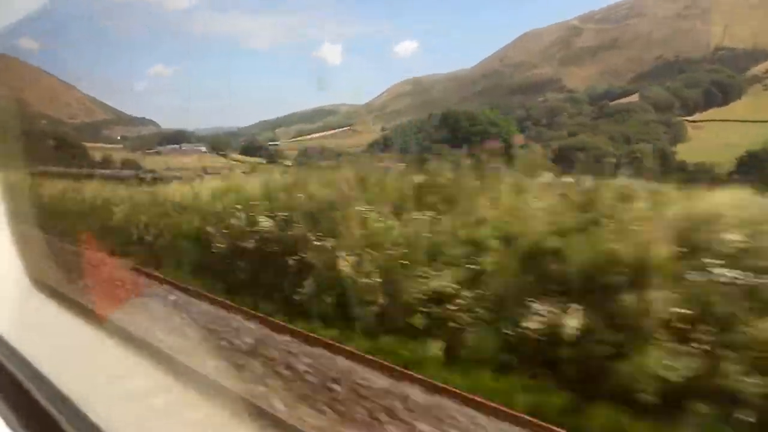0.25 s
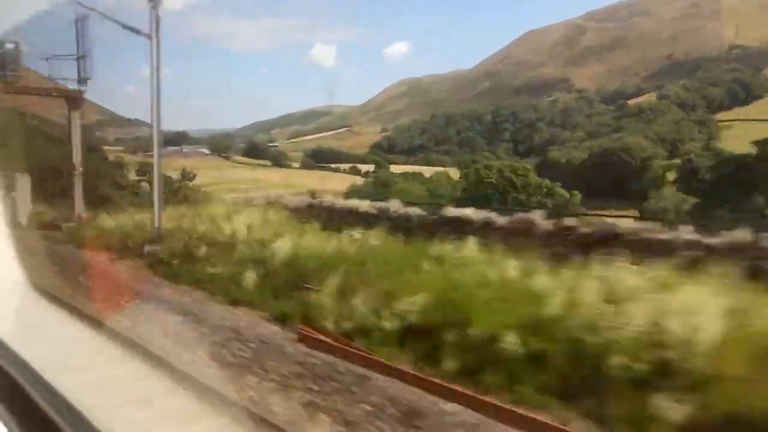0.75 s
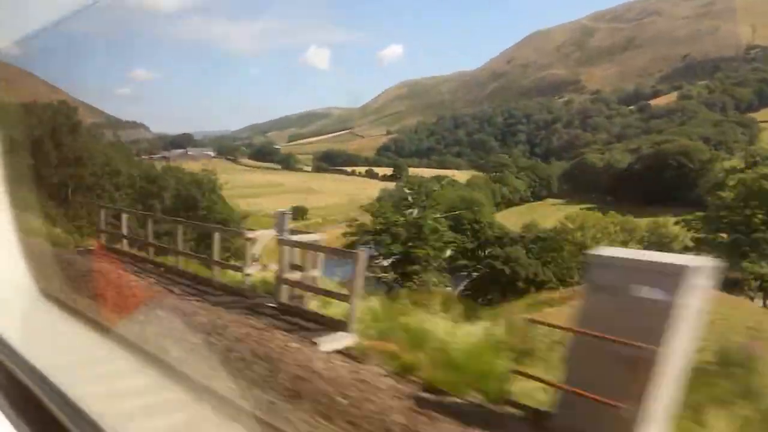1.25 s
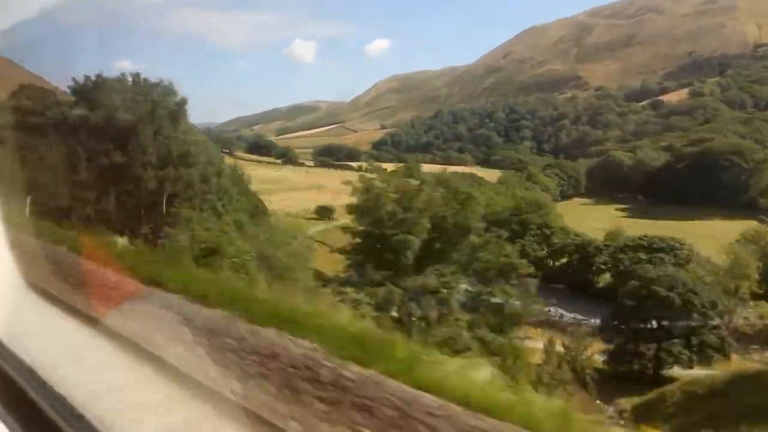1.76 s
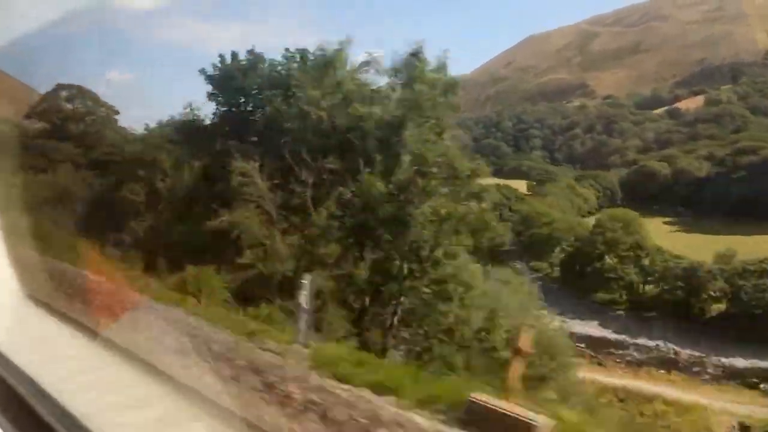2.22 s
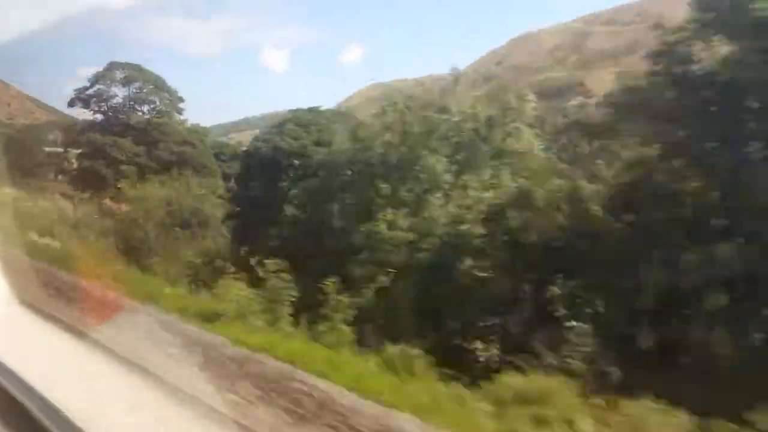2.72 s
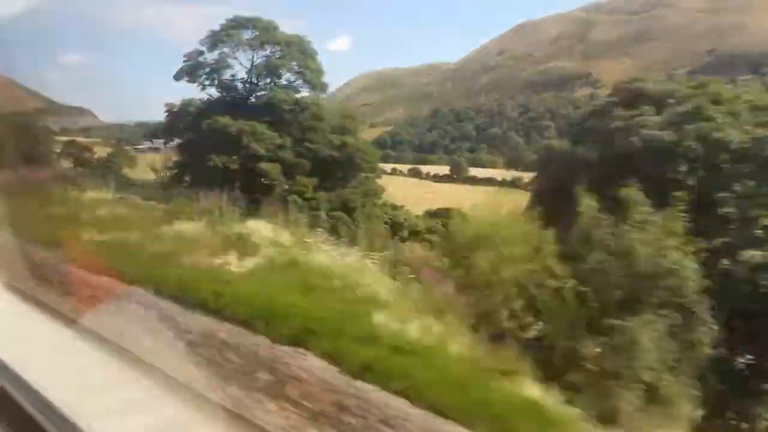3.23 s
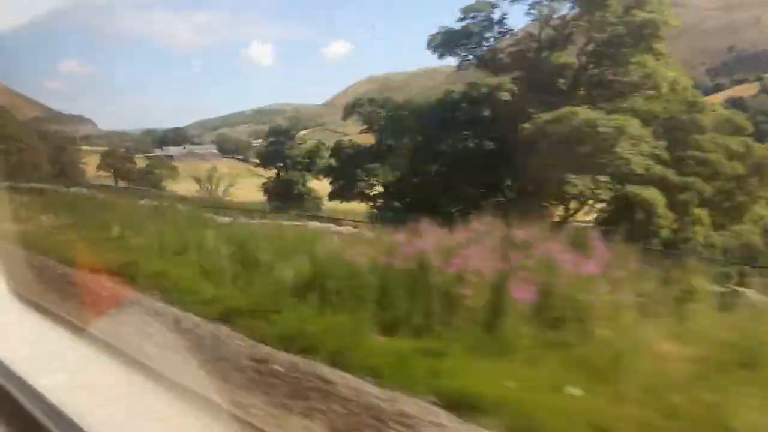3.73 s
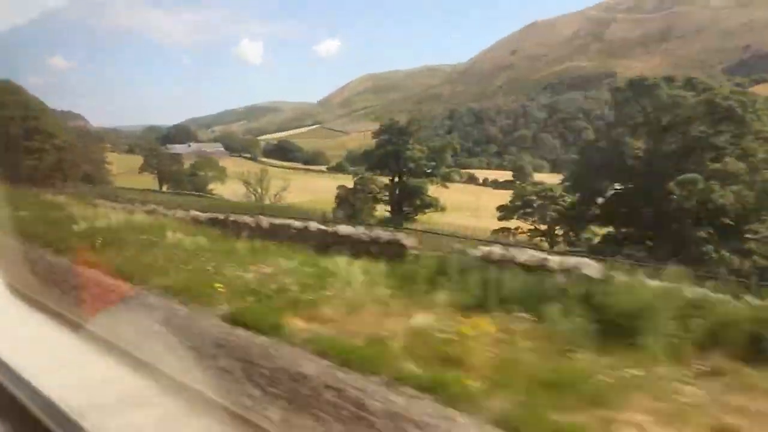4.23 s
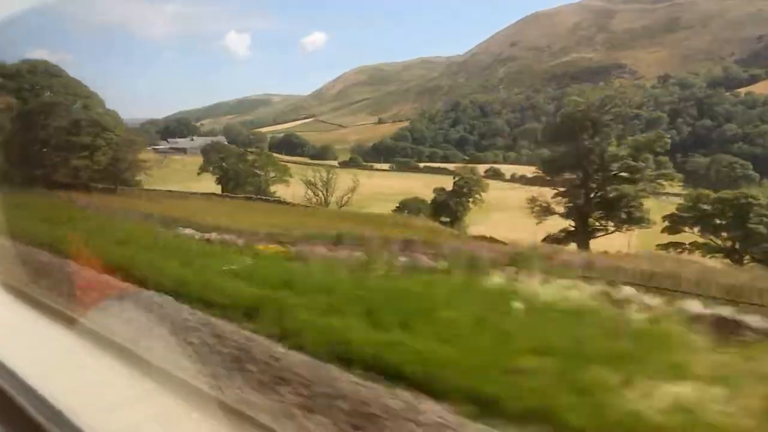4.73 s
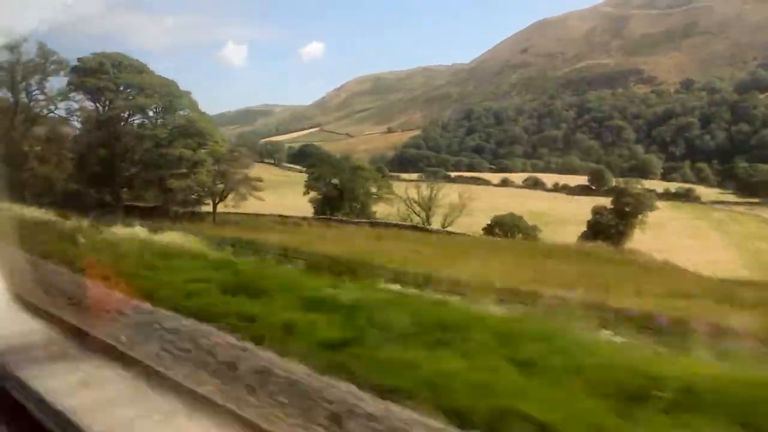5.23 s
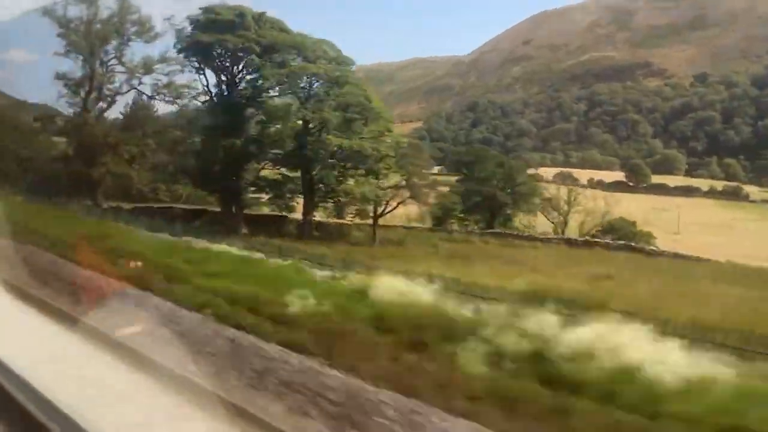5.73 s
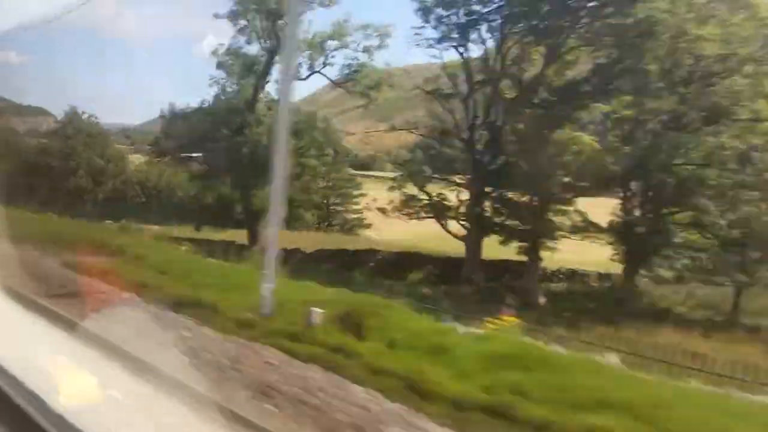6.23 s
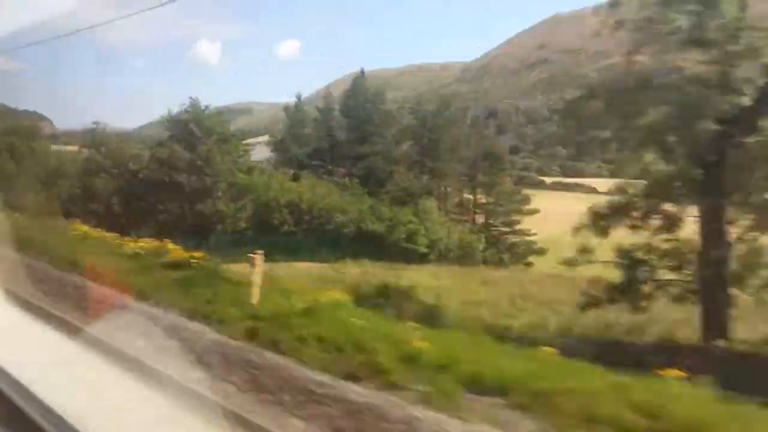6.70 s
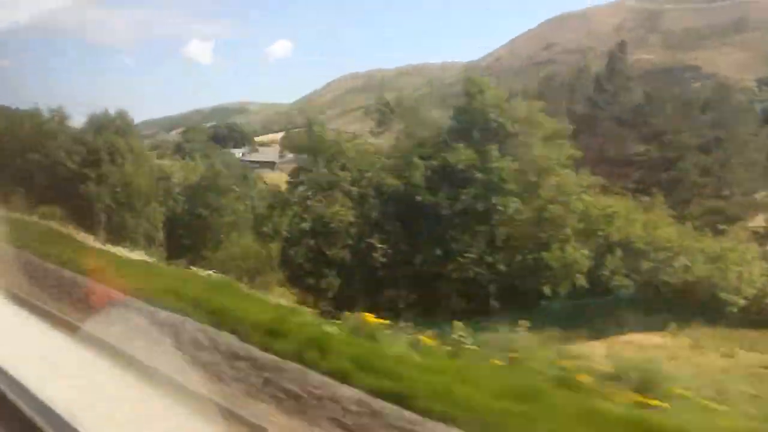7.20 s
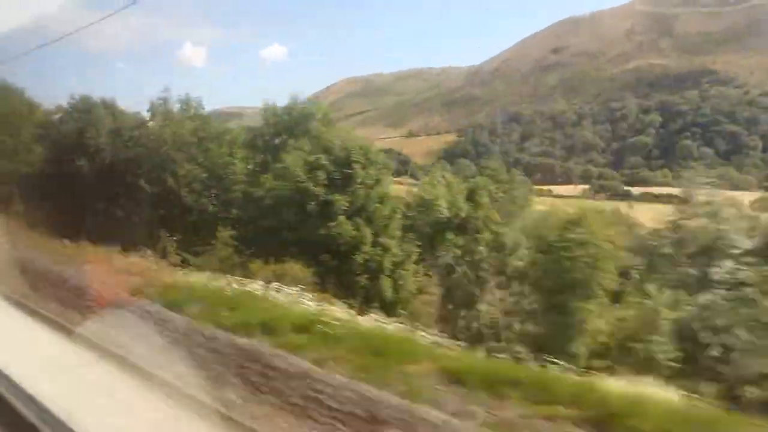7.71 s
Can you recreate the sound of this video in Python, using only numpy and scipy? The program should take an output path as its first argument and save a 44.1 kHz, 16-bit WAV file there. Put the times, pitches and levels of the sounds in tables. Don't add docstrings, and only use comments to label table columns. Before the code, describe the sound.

Inside a fast train carriage, captured close to the window by a phone in stereo. From 0 s a strong, steady boom around 75 Hz fills the floor, with rough wall roar, engine and wheel hum, a wavering gear whine near 780 Hz with a fainter octave, and soft window hiss. Small jolts thud irregularly, several per second. Around 1 s a trim panel begins buzzing harder, a quiet fast rattle; at 1.2-1.4 s a heavier jolt brings squeaks and a short scrape. Near 2 s the bass loosens into uneven swells and dips, its upper tones ringing strongly around 2.5 s. Brief squeaks come at 2.9-3.4 s, faint ticks at 2.8, 4.4 and 5 s. At 6.1 and 6.26 s a loose fitting knocks and bounces, with a sharp tick between; a duller knock follows at 6.6 s. The gear whine fades as rumble continues to an abrupt end near 8 s.

```python
import sys
import numpy as np
from scipy import signal
from scipy.fft import rfft, irfft, next_fast_len
from scipy.io import wavfile
from scipy.ndimage import uniform_filter1d

SR = 44100
rng = np.random.default_rng(int(sys.argv[2]) if len(sys.argv) > 2 else 0)


def level_to_linear(level):
    exponent = np.asarray(level, float) / 20
    return 10 ** exponent


def transcribe(signal):
    frames = np.atleast_2d(signal).T
    limited = np.clip(frames, -1, 1)
    pcm = np.round(limited * 32767).astype(np.int16)
    wavfile.write(sys.argv[1], SR, pcm)


N = 351028

CRANK_HZ = 24.46
# (time [s], length [s], floor thud [dB], ring of the upper tones [dB])
JOLTS = [(.01, 0.073, 5, -3), (.48, 0.15, 1.5, 2), (.69, 0.12, 2.5, 9), (1.05, 0.19, 2, 10),
         (1.35, .11, 7.5, -4), (1.95, .13, 3, 13.5), (2.14, 0.17, 1, 7), (2.48, .22, 4, 7),
         (2.94, .07, 0, 4), (3.19, 0.16, 2.5, 4.5), (3.54, .12, 2.5, 2.5), (3.7, 0.054, 4, 11),
         (3.96, 0.1, 2.5, 7), (4.17, 0.26, 3.5, 2.5), (4.43, 0.14, 1, 6.5), (4.98, .2, 1.5, 2),
         (5.5, 0.17, 0, 8.5), (5.71, 0.13, 2.5, 5.5), (5.93, 0.041, 8, 4), (6.14, 0.091, 8, 10),
         (6.4, .1, -0.5, 7.5), (6.6, 0.11, 7, 6), (7.05, .08, 5, 8), (7.23, 0.089, 2.5, -5),
         (7.51, .11, 1.5, 11.5), (7.65, 0.078, 1.5, -1), (7.83, 0.25, 3, 12)]
# (time [s], level [dB])
STRAIN = [(0, 1), (.5, 0), (.75, 1.5), (1.05, 0.5), (1.23, -2.5), (1.42, 2), (1.95, 0), (2.7, 1.5),
          (3.1, 0), (4.2, 0.5), (4.42, 1.5), (4.8, -2), (5.05, 1.5), (5.95, 0.5), (6.8, 1.5), (7.1, -1),
          (7.3, 2), (7.8, 0)]


def times():
    return np.arange(N) / SR


def pan(db):
    return level_to_linear(np.array([[db / 2], [-db / 2]]))


def walk(rate):
    hold = int(SR / rate)
    levels = np.repeat(rng.standard_normal(N // hold + 1), hold)
    return 1.297 * uniform_filter1d(uniform_filter1d(levels, hold), hold)[:N]


def columns(table):
    s, *values = np.transpose(table)
    return np.array([np.interp(times(), s, v) for v in values])


def still_before(s):
    change_s = .08
    return np.clip((s - times()) / change_s + .5, 0, 1)


def swells(events):
    s, length, *db = np.transpose(events)
    t = times()[::128]
    bells = np.exp(-2 * ((t - s[:, None]) / length[:, None]) ** 2)
    return [np.interp(times(), t, v) for v in db @ bells]


def on_log(hz, table, column):
    rows = np.array(table)
    return np.interp(np.log(hz + 1), np.log(rows[:, 0]), rows[:, column])


def diffuse(colour, db):
    # (frequency [Hz], likeness [0-1], left minus right [dB])
    ears = [(20, 0.7, -1), (110, 0.94, -3.5), (240, 0.96, 0.5), (416, 0.99, -3), (507, 0.4, -2.5),
            (620, 0.6, -5.5), (736, .1, 2.5), (830, 0.4, 1), (990, 0.2, 0), (2000, 0.3, 1), (3600, 0, -1.5),
            (4530, 0.04, 1.5), (5240, 0, -0.5), (7060, 0.1, 7.5), (9000, .05, 0)]
    port_lag_s, field_lag = 0.00036, 0.3
    size = next_fast_len(N)
    hz = np.fft.rfftfreq(size, 1 / SR)
    first, other = rfft(rng.standard_normal((2, size)))
    like = np.clip(on_log(hz, ears, column=1), 0, 1)
    lead = 2 * np.pi * hz * port_lag_s * np.clip((hz - 700) / 400, 0, 1) - field_lag
    second = like * first * np.exp(1j * lead) + np.sqrt(1 - like ** 2) * other
    pair = np.array([first, second]) * pan(on_log(hz, ears, column=2))[:, 0]
    inside = (hz > colour[0][0]) * (hz < colour[-1][0])
    gain = level_to_linear(on_log(hz, colour, column=1)) * inside
    return hz, pair * gain * level_to_linear(db) / np.sqrt(np.mean(gain ** 2))


def ring(modes, bright_db=0.):
    t = np.arange(4096) / SR
    first, apart = rng.random((len(modes), 2, 1)).transpose(1, 0, 2)
    turns = 2 * np.pi * np.stack([first, first + .45 * (apart - .5)], axis=1)
    notes = 0
    for (hz, db, t60), phase in zip(modes, turns):
        fade = level_to_linear(db + bright_db * (hz > 3000) - 60 * t / t60)
        notes = notes + fade * np.sin(2 * np.pi * hz * t + phase)
    contact_s = 0.00051
    return np.sin(np.pi / 2 * np.clip(t / contact_s, 0, 1)) ** 2 * notes


def add(out, s, sound):
    i = int(s * SR)
    out[:, i:i + sound.shape[1]] += sound[:, :N - i]


def boom():
    # pitch [Hz], wander [Hz], lag of the right microphone [radians]
    boom_hz = (74.36, 146.74, 222.7)
    wander_hz = (3.05, 2.986, 3)
    boom_lag = (0.61, 0.13, 0.074)
    boom_db = (-36.5, -36.5, -43.5)
    firm_gain_db = (8, -6.5, -9)
    flicker_db = (7, 7, 8.5)
    # (time [s], left minus right [dB])
    boom_side = [(0, -3), (1.8, -2), (2.8, 2), (3.7, 0.5), (4.7, 3), (5.7, 2), (7.96, 2.5)]
    # (time [s], length [s], swell of the first tone [dB])
    heaves = [(.3, 0.19, 2), (.58, 0.047, -7.5), (1.19, 0.49, 4), (1.42, 0.035, -3), (1.61, 0.15, 2),
              (2.06, 0.054, -1), (2.17, 0.075, 7.5), (2.5, .1, -1), (2.79, .08, -10), (2.95, 0.059, 5),
              (3.21, 0.13, 8), (3.45, 0.071, 6.5), (3.7, 0.036, 11), (3.85, .19, 2), (4.02, .1, 6.5),
              (4.54, 0.13, 13.5), (4.8, .08, -6), (4.98, .15, 2), (5.19, 0.082, -10), (5.33, 0.17, 8),
              (5.48, 0.075, 10.5), (5.68, 0.17, 9), (5.9, 0.032, 12), (6.07, 0.038, 11), (6.3, 0.14, 8),
              (6.48, 0.1, 11.5), (6.67, 0.069, 10.5), (7.02, 0.16, 11.5), (7.2, 0.097, 8), (7.48, 0.098, 6),
              (7.89, 0.12, 10.5)]
    firm_until_s, loose_from_s = 2.187, 1.86
    firm_flicker = 0.36
    ring_db = swells(JOLTS)[1]
    upper_firm = still_before(loose_from_s)
    firm = still_before(firm_until_s), upper_firm, upper_firm
    push = 1.09 * swells(heaves)[0], 0.67 * ring_db, 1.02 * ring_db
    calm = 1 - (1 - firm_flicker) * firm[0], 1, 1
    sides = pan(columns(boom_side)[0])[:, 0], pan(-1.), pan(-.4)
    out = 0
    for k, (hz, wander, side, lag) in enumerate(zip(boom_hz, wander_hz, sides, boom_lag)):
        dropouts = flicker_db[k] * calm[k] * level_to_linear(-.6 * push[k]) * np.minimum(walk(18), .3)
        db = boom_db[k] + firm_gain_db[k] * firm[k] + push[k] + dropouts
        phase = 2 * np.pi * np.cumsum(hz + wander * calm[k] * walk(9)) / SR
        out = out + np.sqrt(2) * level_to_linear(db) * side * np.sin(phase - np.array([[0], [lag]]))
    return out


def roar():
    # (frequency [Hz], level [dB per Hz])
    rumble = [(8, -25.5), (18, -18.5), (36, -12.5), (64, -5), (112, -5), (150, -5), (190, -7.5), (270, -13),
              (360, -15.5), (470, -19.5), (530, -23.5), (780, -20.5), (930, -45.5), (1300, -55)]
    # (frequency [Hz], level [dB per Hz])
    air_hiss = [(530, -31), (900, 0.5), (1320, -7.5), (1460, -7.5), (1540, -3), (1640, -9.5), (2170, -13.5),
                (2360, -9.5), (2750, -11), (2900, -12.5), (3150, -16.5), (3490, -17.5), (5010, -18),
                (5730, -18.5), (7340, -27.5), (8230, -40.5), (8800, -49), (11400, -72), (19400, -120)]
    # (frequency [Hz], width [Hz], level over the rest [dB])
    panels = [(24.5, 4.6, 12), (49.2, 12, 5.5), (91.5, 11, 8), (132.3, 9.1, 4.5), (291, 7.1, 0),
              (337, 18, 4.5), (410, 18, 3), (471, 54, 2.5), (616, 14, 1), (852, 36, 4.5), (1064, 40, 3),
              (1720, 45, 3.5), (1840, 40, 5), (2020, 36, 3.5), (2260, 30, 0.5), (2320, 44, 2.5),
              (2740, 49, 2)]
    # (centre [Hz], driver [0 floor, 1 walls, 2 window, 3 seals], share of that swell [0-1])
    roar_bands = [(60, 0, 0), (150, 0, .2), (270, 0, 1), (470, 0, 1), (620, 1, 1), (1200, 1, 1),
                  (1800, 1, .5), (2300, 2, 1), (2850, 2, 1), (3250, 3, 1), (6000, 3, 1)]
    # (time [s], length [s], level [dB])
    gusts = [(.03, .15, 1), (1.36, 0.14, 3), (1.76, 0.14, 1.5), (2.45, 0.16, 0.5), (3.99, 0.14, 0),
             (4.39, 0.062, -1), (4.5, 0.27, 1.5), (5.2, 0.27, 0.5), (5.87, 0.077, 1), (6.02, 0.072, 3),
             (6.33, 0.13, 2), (6.58, 0.089, 1.5), (6.75, .15, 0)]
    hz, field = diffuse(rumble, -31)
    field = field + diffuse(air_hiss, -49)[1]
    field = field * level_to_linear(sum(db / (1 + (2 * (hz - f) / width) ** 2) for f, width, db in panels))
    thud, gust = swells(JOLTS)[0], swells(gusts)[0]
    walls = 0.15 * thud + 0.92 * gust
    swell = np.array([0.89 * thud, walls, 1.2 * gust, 0.97 * columns(STRAIN)[0]])
    swell = swell - swell.mean(axis=1, keepdims=True)
    centres = np.log([row[0] for row in roar_bands])
    out = 0
    for k, (_, driver, share) in enumerate(roar_bands):
        band = np.interp(np.log(hz + 1), centres, np.arange(len(centres)) == k)
        flicker = (1.3 if driver == 2 else .7) * walk(14)
        out = out + level_to_linear(share * swell[driver] + flicker) * irfft(field * band)[:, :N]
    return out


def hum():
    wheel_hz = 15.985
    # (multiple of the turn rate, level [dB], left minus right [dB], right leads [radians])
    crank_lines = [(1, -46, -2, -.3), (2, -39, -1, -.3), (5.5, -38, -1, -.2)]
    wheel_lines = [(5, -38, -1, -.3), (20, -52, -2, -.1), (22, -47, -2, -.2), (25, -55, -2, -.5),
                   (29, -57, -5, -.1), (37, -63, -6, .3), (38, -63, 2, -1.), (48, -61, 4, 1.6),
                   (49, -47.5, -7, 2.5), (50, -54, -9, 2.1), (51, -65, -5, 3.1), (52, -65, -6, 2.4),
                   (53, -64, 1, -.1), (54, -65, 2, .5), (59, -69, 0, 2.2), (97, -67, 1, -2.6),
                   (98, -61.5, -10, 1.3), (147, -75, 1, -2.)]
    # (frequency [Hz], level [dB], left minus right [dB], right leads [radians])
    gear_lines = [(709.9, -61, 6, -2.9), (726., -61, -6, 2.9), (742.2, -63, -4, 1.7),
                  (1720.6, -73, -3, -1.7), (3660.6, -78, -1, -.3)]
    # (time [s], length [s], level [dB])
    sways = [(0., 0.2, 2.5), (.65, .15, 2), (1.08, 0.078, -6), (1.23, 0.1, 4.5), (1.95, 0.3, 3),
             (2.55, 0.16, 4), (2.9, .15, -0.5), (3.05, 0.091, -1), (3.42, 0.14, 0.5), (4.08, 0.097, -12.5),
             (4.32, 0.24, 4), (4.66, 0.15, -0.5), (4.89, 0.2, 5.5), (5.3, 0.24, -1.5), (6.2, 0.18, 3),
             (6.43, 0.15, -7), (6.7, 0.2, 5), (6.94, 0.092, -8), (7.23, 0.14, 7), (7.5, 0.24, 2)]
    # (time [s], level [dB])
    mesh_load = [(0, 1), (1.3, 3), (1.6, 4.5), (2.8, 4), (3.6, 3.5), (5.5, 3.5), (6.5, 1.5), (6.8, -2),
                 (7.96, -7)]
    # (time [s], length [s], level [dB])
    mesh_gaps = [
        (1.3, .15, -5),
        (3.8, .12, -8),
        (4.3, .16, -4),
        (4.95, .12, -4),
        (6.05, .12, -3),
    ]
    # (time [s], length [s], level [dB])
    unloads = [(.28, .05, -9), (.42, .04, -7), (.66, .12, -9), (1.02, .1, -3), (1.4, .05, -5),
               (1.75, .05, -7), (2.24, .05, -7), (2.4, .06, -7), (2.9, .08, -7), (3.36, .06, -8),
               (3.55, .05, -7), (4.1, .1, -3), (4.47, .07, -7), (4.66, .05, -5), (4.74, .04, -6),
               (5.27, .1, -5), (5.8, .06, -7), (7.06, .06, -5)]
    # (time [s], length [s], level [dB])
    upper_swells = [(.4, 1., 5.5), (1.4, 0.17, 5), (1.95, .45, 8.5), (4.6, .2, 8), (5.4, .4, 4.5),
                    (7.1, .3, 5), (7.75, .15, 3)]
    lines = [(k * CRANK_HZ, *rest) for k, *rest in crank_lines]
    lines = lines + [(k * wheel_hz, *rest) for k, *rest in wheel_lines] + gear_lines
    speed = np.cumsum(1 + 0.0003996 * walk(1)) / SR
    beats = [level_to_linear(2.6 * walk(3.5)) * pan(1.5 * walk(1.9))[:, 0] for _ in range(4)]
    sway = swells(sways)[0]
    mesh = level_to_linear(-0.52 * sway + columns(mesh_load)[0] + swells(mesh_gaps)[0] + 1.5 * walk(9))
    octave = level_to_linear(2.0 + 1.68 * sway + swells(unloads)[0] + .9 * np.minimum(walk(16), 0))
    upper = level_to_linear(swells(upper_swells)[0] - 2.5 + 1.5 * walk(6))
    gear = {49: mesh, 50: upper, 98: octave}
    out = 0
    for k, (hz, db, pan_db, lead) in enumerate(lines):
        phase = 2 * np.pi * (hz * speed + rng.random())
        swell = gear.get(round(hz / wheel_hz), beats[k % len(beats)])
        right_lead = np.array([[0], [1]]) * (lead + 0.25 * sway * (hz > 1500))
        out = out + level_to_linear(db) * pan(pan_db) * swell * np.sin(phase + right_lead)
    return out


def floor_rings():
    # (time [s], length [s], frequency [Hz], level [dB])
    floor_notes = [(.35, 0.17, 185.3, -38.5), (.45, 0.07, 149, -36), (1.0, .1, 148.4, -36.5),
                   (1.365, 0.04, 458, -36), (1.338, 0.026, 406, -35), (1.322, 0.03, 353, -35.5),
                   (1.41, 0.052, 326, -36), (1.94, 0.09, 294, -39), (1.945, .1, 349, -36.5),
                   (1.94, 0.088, 411, -36), (2.417, .14, 290.7, -39.5), (2.46, 0.076, 141, -24.5),
                   (2.492, .13, 220.8, -27.5), (2.501, .09, 462, -38.5), (2.494, 0.076, 1058, -56.5),
                   (2.589, 0.059, 408, -40.5), (2.63, .06, 138.8, -25), (2.75, 0.057, 142, -29),
                   (2.95, 0.065, 148, -26.5), (3.069, 0.16, 296.3, -42), (3.2, 0.11, 139.7, -33.5),
                   (3.35, .08, 151, -36), (3.668, 0.072, 346.4, -40), (3.672, .08, 414, -39),
                   (3.663, 0.074, 301, -39.5), (3.62, .12, 141, -30), (4.13, .2, 144.8, -30),
                   (4.15, 0.065, 292, -36.5), (4.151, .1, 222, -35), (4.248, 0.11, 350.5, -40.5),
                   (4.449, 0.091, 297, -47), (4.85, 0.14, 148, -44), (3.72, 0.087, 147.7, -32),
                   (5.651, 0.13, 349.4, -41.5), (5.846, 0.059, 296, -44), (5.94, .1, 219.5, -33),
                   (6.149, 0.056, 401, -34.5), (6.453, 0.066, 293, -37), (6.582, .05, 358, -43),
                   (6.622, 0.077, 295, -35), (6.655, 0.054, 343, -40.5), (7.045, .08, 290, -38),
                   (7.2, 0.13, 143.6, -32.5), (7.223, .1, 354, -36.5), (7.662, 0.065, 292, -42),
                   (7.841, .12, 289, -39), (1.75, .12, 144.4, -31.5), (4.419, 0.054, 221, -32),
                   (6.123, 0.054, 690, -45), (7.8, .1, 465, -43)]
    out = np.zeros((2, N))
    for s, length, hz, db in floor_notes:
        t = np.arange(-length, length, 1 / SR)
        phase = 2 * np.pi * hz * t * (1 - .03 * t) - np.array([[0], [.2]])
        bell = np.exp(-3 * (t / length) ** 2)
        add(out, s - length, np.sqrt(2) * level_to_linear(db) * pan(-1.2) * bell * np.sin(phase))
    ragged_db = 2.5
    return out * level_to_linear(ragged_db * np.minimum(walk(45), .5))


def trim_buzz():
    # (frequency [Hz], level [dB], time to fade by 60 dB [s])
    trim = [(3780, -4, .02), (3990, -8, .03), (4300, -8, .02), (4650, -6, .02), (5305, -8, .03),
            (5570, -3, .02), (5840, 0, .025), (6140, -5, .02), (6450, -5.5, .02), (6800, -10, .02)]
    # (time [s], lag [s])
    firing_lag = [
        (0, .0122),
        (2.2, .0122),
        (4.3, .0185),
        (5.5, .0172),
        (7.96, .0172),
    ]
    seats_s = 1
    beat = np.arange(0, N / SR, 1 / (3 * CRANK_HZ))
    place = (beat + np.interp(beat, *np.transpose(firing_lag))) * SR
    place = place + 4.5 * walk(5)[(beat * SR).astype(int)]
    chance = rng.standard_normal((len(place), 2))
    taps = np.zeros(N)
    spots = np.clip(place + .55 * chance[:, 0], 0, N - 1).astype(int)
    taps[spots] = level_to_linear(1.2 * chance[:, 1])
    grit = np.convolve(taps, np.exp(-np.arange(400) / 190.0))[:N] * rng.standard_normal(N)
    level_db = 1.1 * columns(STRAIN)[0] + 1.1 * walk(11) - 3. * still_before(seats_s)
    drive = (taps + 0.1 * grit) * level_to_linear(level_db)
    buzz = signal.fftconvolve(drive[None], ring(trim))[:, :N]
    return buzz * level_to_linear(-65.5) / np.sqrt(np.mean(buzz ** 2))


def fittings():
    # (time [s], peak [dB], left minus right [dB], bluntness)
    ticks = [
        (2.786, -68, 2.5, 6),
        (4.3948, -61.5, 9, 3.5),
        (4.406, -61, 5, 4),
        (4.4478, -69, 3, 6),
        (5.0118, -65.5, 7, 6),
        (5.0642, -69, 0, 6),
        (6.1973, -56.5, 8, 2),
        (7.2385, -66.5, 3, 5),
    ]
    # (time [s], peak [dB], left minus right [dB], brightness [dB])
    knocks = [
        (6.079, -40.5, -1, -4),
        (6.089, -41, 3, -8),
        (6.099, -41, -6.5, -12),
        (6.260, -40, 3, 1),
        (6.267, -40.5, 1, 3),
        (6.276, -41.5, -3, -9),
        (6.291, -49, -1, -9),
        (6.62, -40, 3, -11),
    ]
    # (frequency [Hz], level [dB], time to fade by 60 dB [s])
    fitting = [(1270, -1, 0.092), (1360, 5, 0.022), (1495, -1, 0.026), (1730, -7, .03), (1915, -5, 0.042),
               (2590, -11, .03), (2770, -10, 0.03), (3440, -0.5, 0.016), (3650, -8, .016),
               (4200, -4.5, 0.018), (4770, -8, 0.016), (5200, -10, .016)]
    # (time [s], frequency [Hz], level [dB], 60 dB
    # fade [s])
    pings = [(6.0795, 1480, -38, 0.032), (6.0835, 1240, -41, .035), (6.0795, 3600, -48, .02),
             (6.080, 4200, -47, .015), (6.086, 2850, -51, .03), (6.100, 1280, -43, .04),
             (6.096, 4100, -53, .015), (6.231, 2700, -50, .02), (6.260, 1380, -42, .035),
             (6.2605, 3700, -50, .02), (6.2675, 3480, -44, .02), (6.268, 4150, -48, .02),
             (6.268, 5050, -51, .03), (6.272, 2300, -50, .03), (6.279, 2400, -50, .03),
             (1.640, 800, -39, .04), (6.504, 800, -42, .04)]
    # (time [s], level [dB], pitch [Hz], length [s], rise [Hz],
    # roughness [Hz])
    squeaks = [(.66, -58, 4340, .12, -1, 460), (1.36, -56.5, 2900, 0.098, 0, 440),
               (6.6, -59, 2800, .1, 0, 350), (1.318, -55, 2720, .065, 429, 60),
               (1.33, -61, 3750, .05, -1, 44), (6.95, -58.5, 2770, .06, -70, 80),
               (6.26, -60, 2720, .1, 0, 90), (2.79, -64, 7300, .03, 0, 350), (4.52, -55, 1780, .05, 1, 90),
               (1.3, -49, 1080, .09, 0, 194), (2.931, -54.5, 2850, 0.036, 7.5, 150),
               (3.31, -59, 1590, 0.045, 200, 70), (3.357, -49, 1835, 0.03, 25, 25),
               (3.387, -60, 1830, .05, -59, 60), (3.95, -54, 2800, 0.077, 0, 250),
               (6.1, -54, 1268, 0.04, 3, 60), (1.222, -56, 3100, .035, 1, 70),
               (1.364, -50.5, 2800, .026, 1, 40), (6.365, -55.5, 2390, 0.049, 0, 80),
               (5.9, -56, 2730, .04, 1, 140), (6.56, -55, 2550, 0.053, 1, 240)]
    out, t = np.zeros((2, N)), np.arange(8192) / SR
    for s, db, pan_db, blunt in ticks:
        snap = np.diff(np.exp(-(t * SR - 30) ** 2 / blunt)) * np.sqrt(blunt / 1.5)
        echoes = .07 * rng.standard_normal((2, len(snap))) * level_to_linear(-60 * t[1:] / .006)
        add(out, s, level_to_linear(db + 16.0) * pan(pan_db) * (snap + echoes))
    cabin = rng.standard_normal((2, len(t))) * level_to_linear(-23.5 - 60 * t / 0.12)
    cabin[:, 0] = 1
    contact = signal.butter(4, (1000, 5500), "bandpass", fs=SR, output="sos")
    for s, db, pan_db, bright_db in knocks:
        burst = rng.standard_normal((2, 4096)) * level_to_linear(6.5 - 60 * t[:4096] / 0.026)
        knock = ring(fitting, bright_db) + signal.sosfilt(contact, burst)
        add(out, s, level_to_linear(db - 9.0) * pan(pan_db) * signal.fftconvolve(knock, cabin, axes=1))
    for s, hz, db, t60 in pings:
        add(out, s, ring([(hz, db, t60)]))
    for s, db, hz, length, rise_hz, rough_hz in squeaks:
        along = np.clip(t / length, 0, 1)
        stagger = 6.5 * uniform_filter1d(rng.standard_normal((1, len(t))), size=44)
        phase = 2 * np.pi * np.cumsum(hz + rise_hz * along + rough_hz * stagger, axis=1) / SR
        fade = np.sqrt(np.abs(np.sin(np.pi * along)))
        add(out, s, level_to_linear(db) * fade * np.sin(phase - np.array([[0], [.8]])))
    return out


def phone_hiss():
    # (frequency [Hz], level [dB per Hz])
    hiss_colour = [(4820, -30.5), (8000, -14.5), (9000, -9), (13000, -11.5), (14000, -13), (14500, -1),
                   (15100, 0.5), (15520, 0)]
    return irfft(diffuse(hiss_colour, -73.5)[1])[:, :N]


def scene():
    return boom() + roar() + hum() + trim_buzz() + fittings() + floor_rings()


def low_pass(x):
    return signal.sosfilt(signal.butter(12, 15550, fs=SR, output="sos"), x)


def record(dry):
    stop = np.clip((N / SR - times()) / .008, .25, 1)
    return low_pass((dry + phone_hiss()) * stop)


dry = scene()
out = record(dry)
transcribe(out)
```